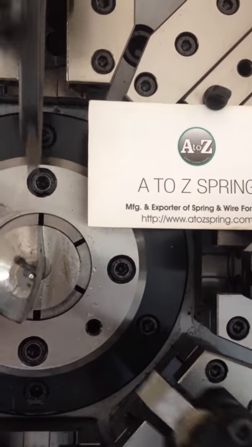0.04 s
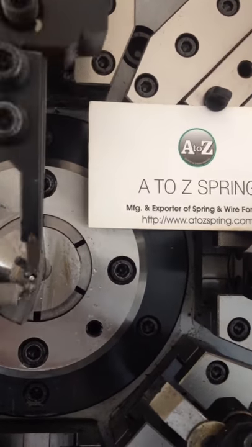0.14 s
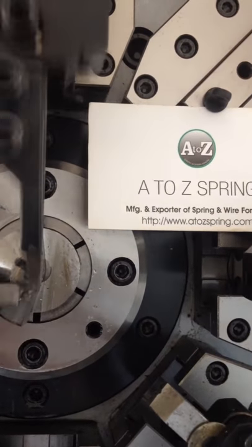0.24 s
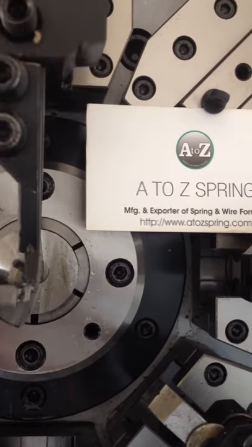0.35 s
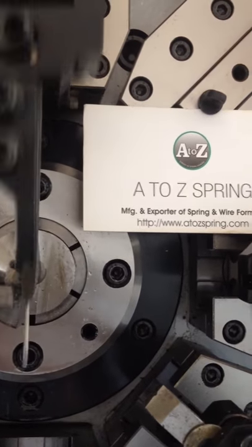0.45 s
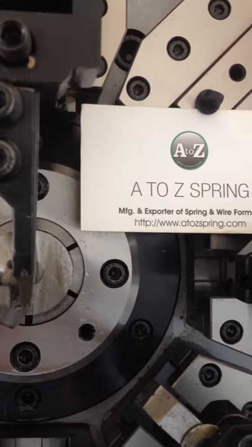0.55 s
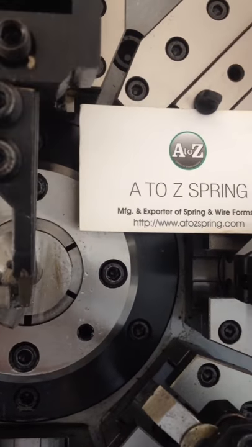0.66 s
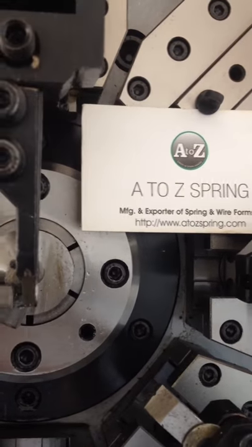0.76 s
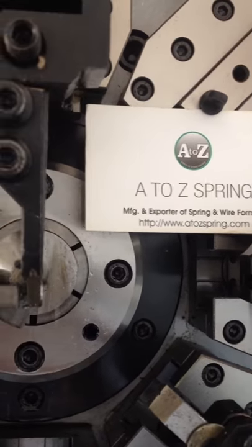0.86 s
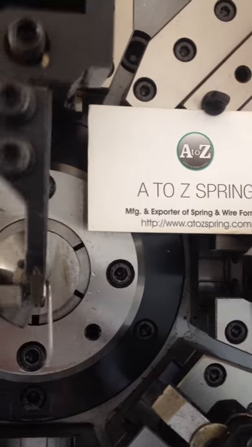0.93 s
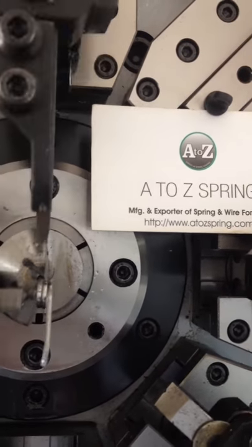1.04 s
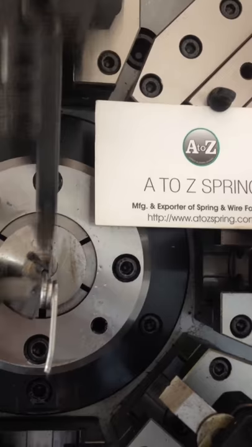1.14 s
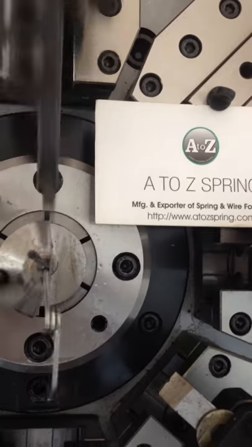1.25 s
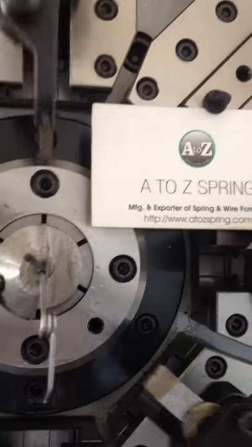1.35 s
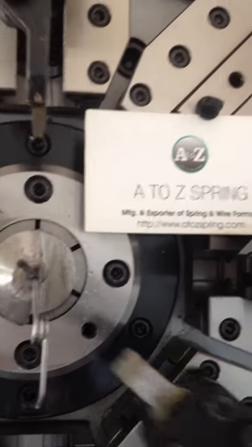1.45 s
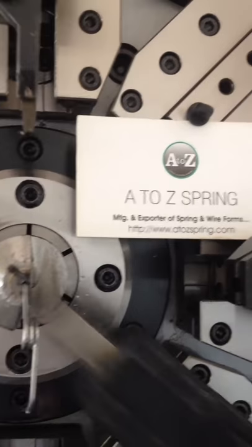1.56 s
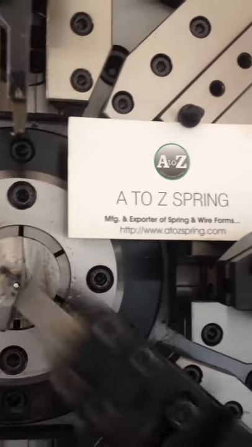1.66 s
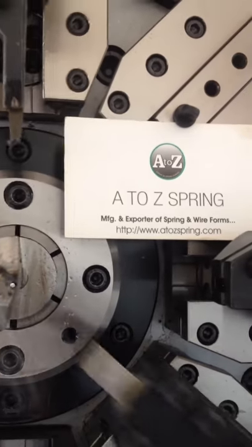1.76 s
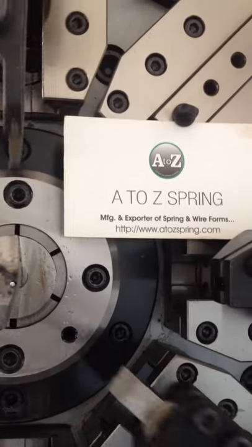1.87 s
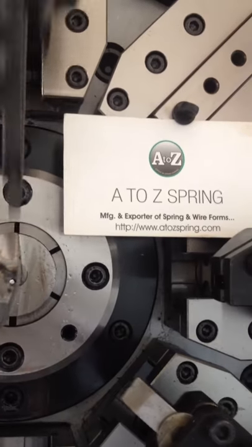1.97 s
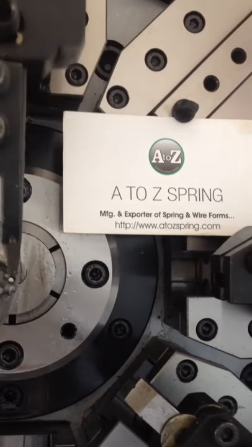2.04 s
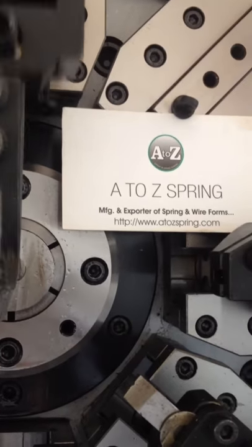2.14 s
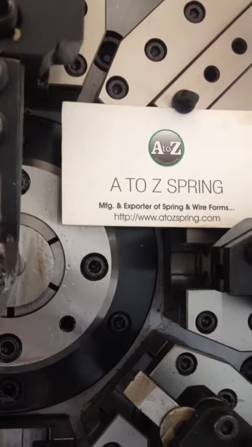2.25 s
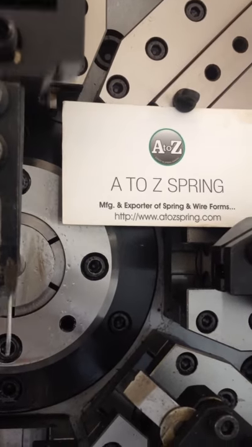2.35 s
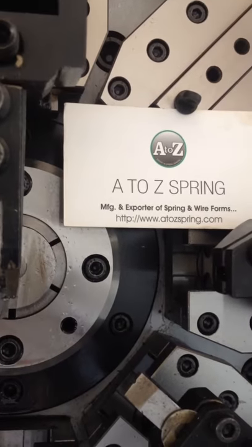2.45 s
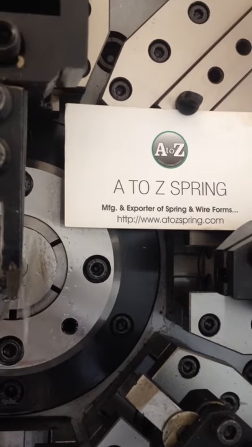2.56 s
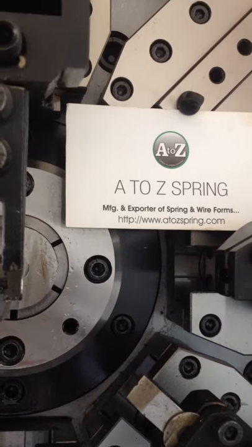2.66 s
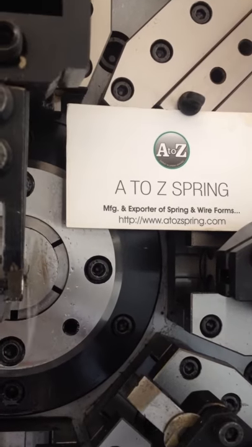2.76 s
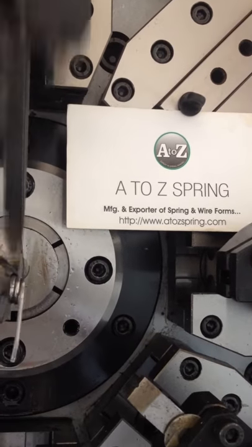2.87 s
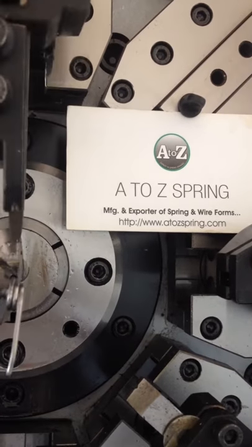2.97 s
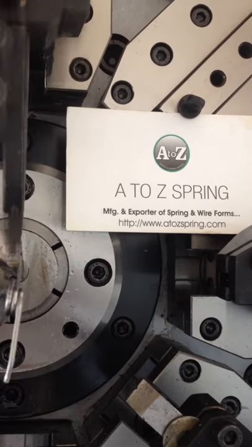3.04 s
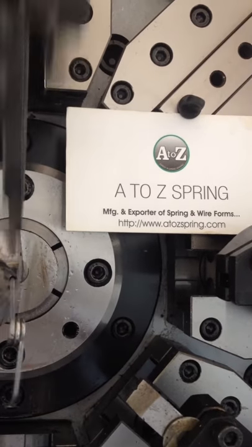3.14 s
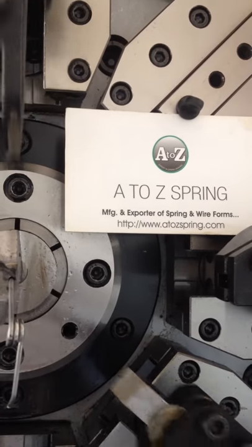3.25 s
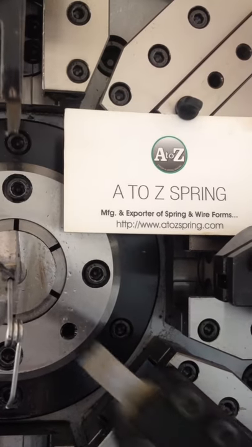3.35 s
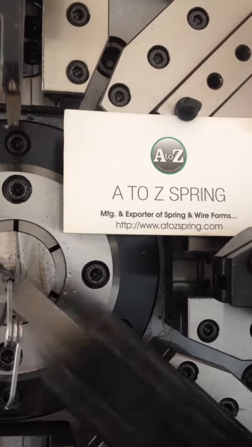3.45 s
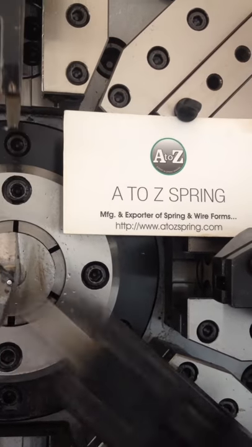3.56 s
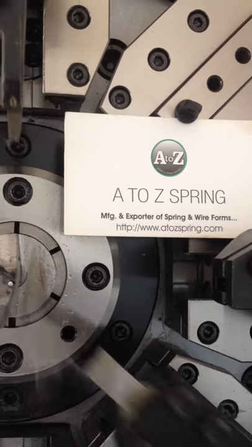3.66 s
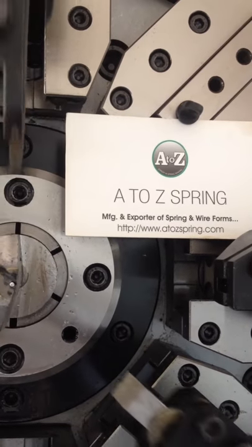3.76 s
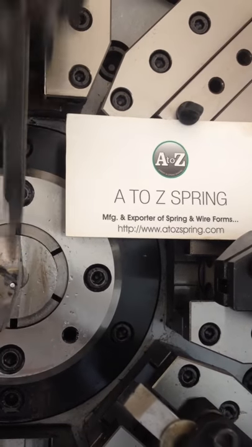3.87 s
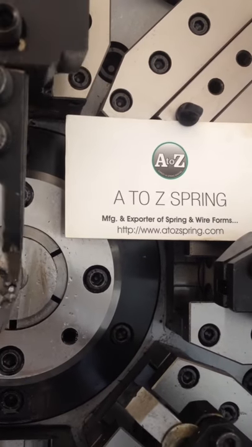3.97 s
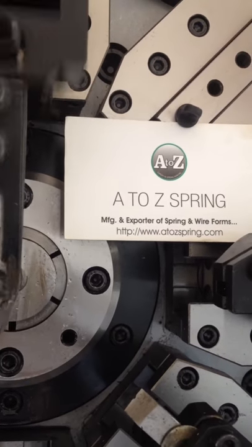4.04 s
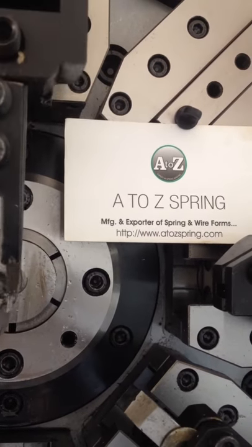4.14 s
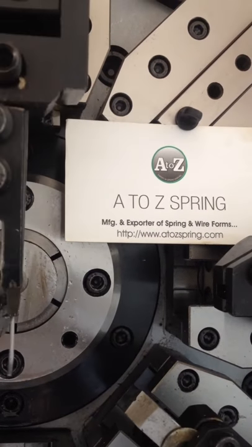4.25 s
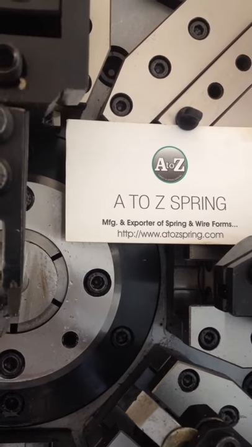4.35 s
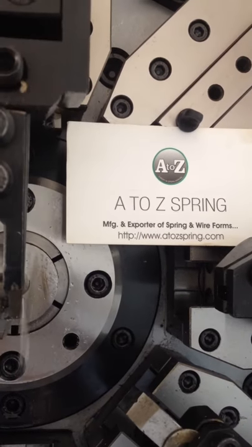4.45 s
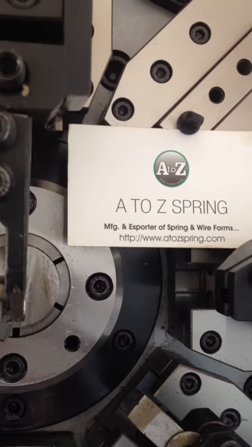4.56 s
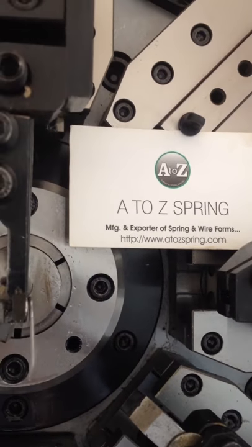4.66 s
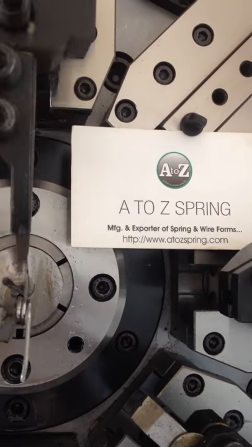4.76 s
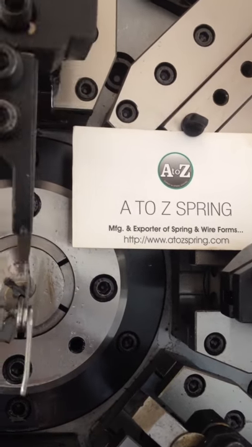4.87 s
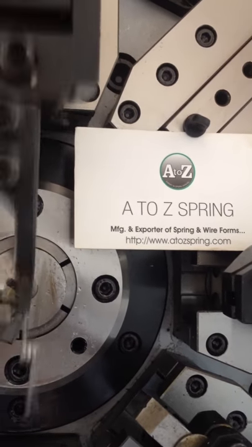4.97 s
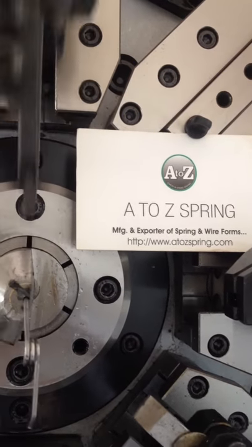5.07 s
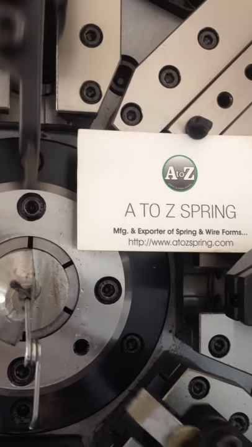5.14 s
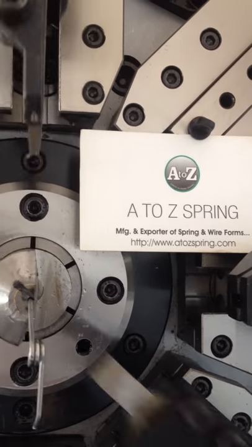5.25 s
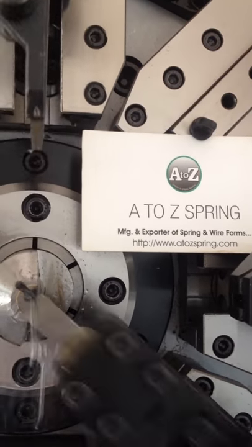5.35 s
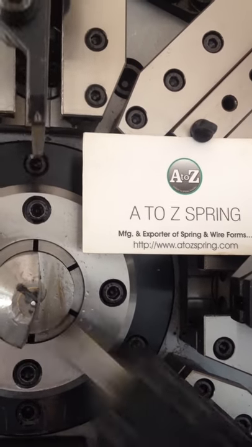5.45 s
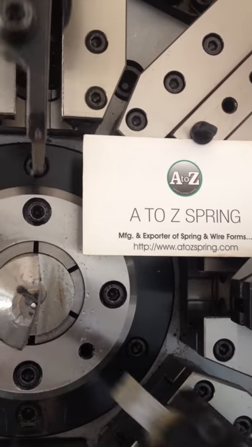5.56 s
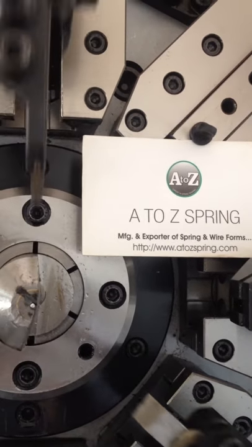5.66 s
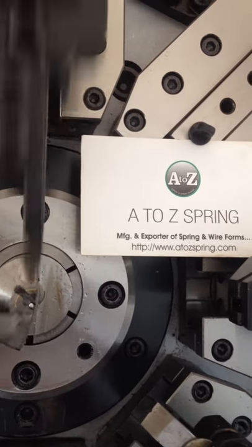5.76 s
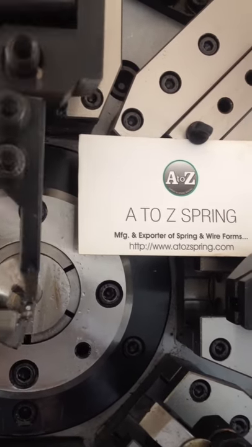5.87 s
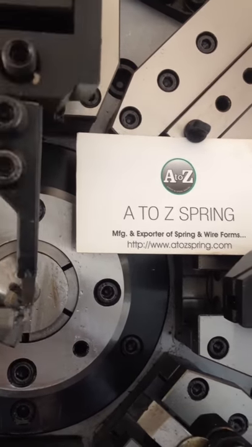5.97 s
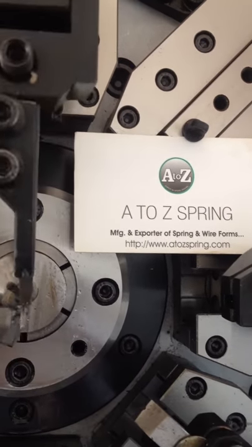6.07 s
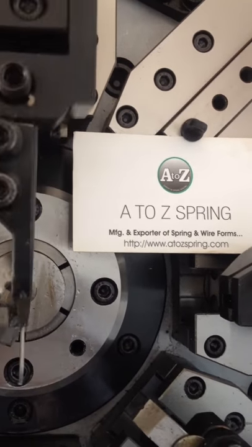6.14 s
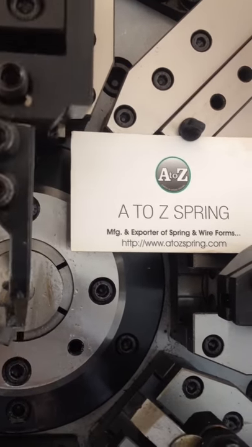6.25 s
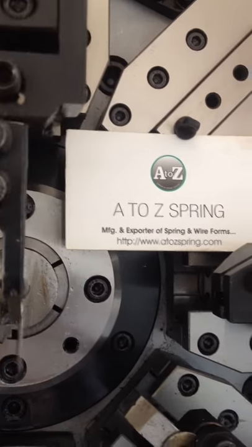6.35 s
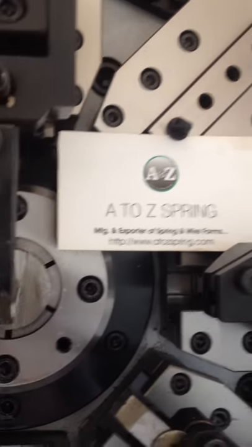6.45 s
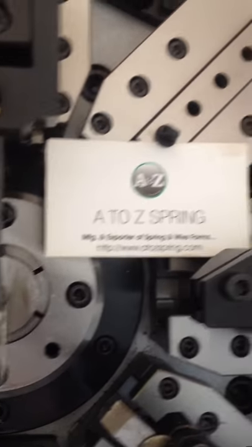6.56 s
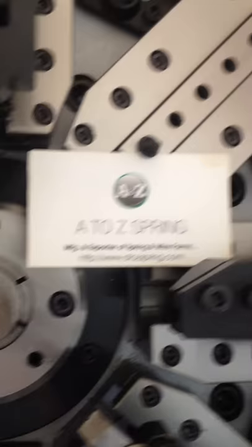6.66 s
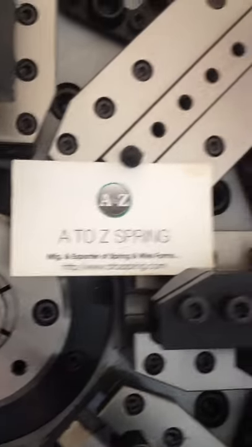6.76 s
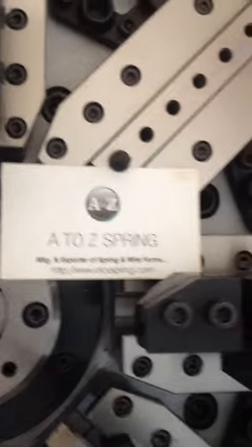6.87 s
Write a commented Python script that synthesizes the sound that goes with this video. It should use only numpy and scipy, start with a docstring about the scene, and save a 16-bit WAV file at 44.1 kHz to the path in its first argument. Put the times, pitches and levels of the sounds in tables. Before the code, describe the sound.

Over the wavering low hum of a factory, a nearby wire-forming machine works in a steady cycle. Soft whirs and a faint tick lead up to each sharp cutting knock, which leaves a short, low metallic ring. The knock comes three times, evenly spaced. Small metal parts tap with a slight echo in the second half, while distant machines and a light hiss fill the background.

```python
"""In a factory hall, a machine bends wire into springs. Once a cycle its cutter knocks and the
steel frame rings. Tool slides whir at fixed points of the cycle over the noise of the motor.
Metal parts tap nearby. Behind it all lie the hall's hum, distant machines and microphone hiss."""
import sys
import numpy as np
from scipy import signal
from scipy.io import wavfile
from scipy.ndimage import uniform_filter1d

SR = 44100
rng = np.random.default_rng(int(sys.argv[2]) if len(sys.argv) > 2 else 0)


def store_pcm(level_fs):
    """Save levels as 16-bit WAV."""
    pcm = np.round(np.clip(level_fs, -1, 1) * 32767).astype(np.int16)
    wavfile.write(sys.argv[1], SR, np.atleast_2d(pcm).T)


N = 304731

# Levels in the tables are relative. A "fade" is the time a sound takes to drop by 60 dB.
# Ringing tones of the frame and tool plate: f/Hz, level/dB, fade/s
FRAME_TONES = [(159.6, -32, 0.85), (184.2, -23.5, 0.24), (191, -34, .5), (202.4, -15, .65),
               (208.6, -38, 0.87), (228.3, -22.5, 0.29), (249.4, -29.5, 0.23), (293.5, -25, 0.46),
               (318.6, -25.5, 0.48), (355.3, -26.5, 0.49), (376, -29, 0.19), (430.5, -26.5, 0.28),
               (448, -44, 0.52), (482, -28, .2), (513.7, -30, 0.26), (640, -36, 0.11), (752.4, -26.5, .22),
               (803, -33, 0.15), (810, -29, 0.28), (817, -33, 0.12), (1440, -37, 0.11), (1626, -48, .3),
               (2450, -52, .2), (2523, -50, 0.2), (2640, -52.5, .22), (4630, -52.5, 0.022),
               (5900, -67.5, .1), (6480, -57, 0.082), (7880, -58.5, 0.02), (11500, -69, .02)]
# Tones of the snapping blade: f/Hz, level/dB, fade/s
BLADE_TONES = [(436, -11, 0.016), (865, -15, 0.024), (1176, -17, 0.02), (1966, -35, 0.031),
               (4110, -52.5, 0.015)]
# Clatter of many small vibrations: f/Hz, level/dB
CLATTER_SPECTRUM = [(300, -49), (600, -37), (1200, -47), (2400, -56.5), (4000, -65), (7000, -75),
                    (14000, -81.5)]
# How long the clatter lasts: f/Hz, fade/s
CLATTER_FADES = [(300, 1), (1000, 0.51), (2500, .2), (5000, 0.055), (12000, 0.023)]
# Moves of the tool slides: t/s after the cut, length/s, level/dB
SLIDE_MOVES = [(.42, .04, -61), (.55, .06, -55), (.80, .12, -62), (1.245, .045, -55.5), (1.49, .08, -53.5),
               (1.76, .1, -60)]
# Noise bands of a moving slide: f/Hz, width/Hz, level/dB
SLIDE_BANDS = [(350, 60, -3), (700, 150, -4), (890, 130, 0), (1300, 400, -14)]
# Noise bands of the motor in its housing: f/Hz, width/Hz, level/dB
MOTOR_BANDS = [(345.2, 36.3, -53.5), (848, 160, -68)]
# The motor gets louder: t/s after the cut, length/s, boost/dB
MOTOR_SURGES = [(.55, .06, 2), (.86, .12, 1.5), (1.09, .05, 4), (1.49, .08, 3)]
# Metal taps: t/s, level/dB, f/Hz, fade/s, thud boost/dB, echo boost/dB
METAL_TAPS = [(2.410, -57, 1600, .03, -10, -6), (2.526, -56.5, 1414, 0.11, -10, 3),
              (4.098, -44, 1360, 0.023, 15.5, 8), (4.3685, -38, 1730, 0.016, 1, 0),
              (4.544, -51.5, 1500, 0.023, -12, -8), (6.1435, -36.5, 1445, 0.032, -16, -2),
              (6.162, -38, 1610, 0.029, -4, 3), (6.244, -42, 790, 0.028, 0, -10),
              (6.267, -38.5, 1140, 0.015, 10.5, 9), (6.280, -40, 1550, 0.017, -2, 3),
              (6.283, -27, 692, 0.047, -4, 3)]
# Tones of a tapped part: multiple of its pitch, level/dB
PART_TONES = [(1, 2.5), (1.3, -6), (1.75, -24.5), (2.4, -31)]
# Low hum of the hall: f/Hz, level/dB
HUM_SPECTRUM = [(100, -39.5), (118, -41.5), (130, -8), (145, 7), (199, 4), (250, -4.5), (300, -11.5),
                (400, -59.5)]
# The hum dips while the drives rest: t/s after the cut, length/s, change/dB
HUM_DIPS = [(1.38, .05, -4), (1.72, .05, -2)]
# Wash of distant machines and hiss: f/Hz, level/dB
WASH_SPECTRUM = [(20, -49), (50, -21), (100, -11.5), (200, -1), (300, 2), (430, -4), (913, -13),
                 (1100, -19.5), (1940, -32), (3500, -38.5), (6000, -42), (9690, -58), (12000, -46.5),
                 (14000, -38.5), (15300, -42)]

CYCLE_S, FIRST_CUT_S, CUT_GAIN_DB = 1.8822, -.1952, -.5
# A tick once a cycle: t/s after the cut, then the other columns of a metal tap
TICK_S, TICK = 1.4365, (-52, 1500, .018, 2, 2)
WHINE_HZ, WHINE_DB = 2815, -89.5
HUM_DB, WORK_BOOST_DB, WAVER_DB, WASH_DB = -38.6, 3, .5, -49
TREBLE_LIMIT_HZ = 15380


def cutter():
    """The blade shears the wire at the same spot, so the frame rings the same way each time."""
    t = np.arange(SR * 3 // 4) / SR
    ring = ringing(FRAME_TONES, t, rise_cycles=3.1) + ringing(BLADE_TONES, t, rise_cycles=1.0)
    clatter = 10 * noise_burst(CLATTER_SPECTRUM, CLATTER_FADES, rise_s=0.00097)
    out = np.zeros(N)
    for start in cut_times():
        add(out, start, ring)
        add(out, start, clatter)
    return amp(CUT_GAIN_DB) * out


def slides():
    """Each tool slide whirs as it moves at its own point in the cycle."""
    return cycle_swells(SLIDE_MOVES, amp) * band_noise(SLIDE_BANDS)


def motor():
    """The motor drones and surges in its housing; its electronics add a thin whine."""
    t = np.arange(N) / SR
    drone = amp(cycle_swells(MOTOR_SURGES, float)) * band_noise(MOTOR_BANDS)
    whine = amp(WHINE_DB) * np.sqrt(2) * np.sin(2 * np.pi * WHINE_HZ * t)
    return drone + whine


def taps():
    """A tapped metal part gives a short ring and a thud, then the hall echoes."""
    out, t = np.zeros(N), np.arange(SR // 10) / SR
    onset = 1 - np.exp(-(t / 0.00063) ** 2)  # distance softens the start
    thud_tones = np.sin(2 * np.pi * 260 * t) + 0.49 * np.sin(2 * np.pi * 450 * t)
    ticks = [(cut + TICK_S, *TICK) for cut in cut_times()]
    for start, db, hz, fade, thud_db, echo_db in METAL_TAPS + ticks:
        tones = sum(amp(level) * np.sin(2 * np.pi * ratio * hz * t) for ratio, level in PART_TONES)
        ring = amp(-60 * t / fade) * tones
        thud = amp(thud_db - 60 * t / 0.063) * thud_tones
        echo_spectrum = [(0.088 * hz, -6), (0.18 * hz, 0), (0.74 * hz, 0),
                         (1.02 * hz, -8), (1.91 * hz, -24), (5 * hz, -60)]
        echo = 2 * noise_burst(echo_spectrum, fades=[(500, 0.31), (3000, 0.1)], rise_s=0.0047)
        add(out, start, amp(db) * onset * (ring + thud))
        add(out, start, amp(db + echo_db) * echo)
    return out


def hall():
    """The hum wavers, swells as the slides work and dips as they rest, beside a steady wash."""
    t = np.arange(N) / SR
    work = cycle_swells(SLIDE_MOVES, amp)
    rates_hz = np.geomspace(.3, 4, num=16)
    waver = sum(np.sin(2 * np.pi * (hz * t + rng.random())) / np.sqrt(hz) for hz in rates_hz)
    hum_db = HUM_DB + WORK_BOOST_DB * work / work.max() + cycle_swells(HUM_DIPS, float)
    hum_db += WAVER_DB * unit_level(waver)
    hum = amp(hum_db) * drifting_noise(HUM_SPECTRUM, drift_db=2.0)
    wash = amp(WASH_DB) * drifting_noise(WASH_SPECTRUM, drift_db=-0.4)
    return hum + wash


def cut_times():
    """One cut every cycle, in seconds."""
    return np.arange(FIRST_CUT_S, N / SR, CYCLE_S)


def cycle_swells(rows, convert):
    """Smooth swells that return every cycle; convert turns a row's dB into a height."""
    since_cut = (np.arange(N) / SR - FIRST_CUT_S) % CYCLE_S
    return sum(convert(db) * np.exp(-2 * ((since_cut - at) / length) ** 2) for at, length, db in rows)


def ringing(tones, t, rise_cycles):
    """Tones of struck metal build up, then fade; neighbours start in opposite directions."""
    out = np.zeros(len(t))
    for k, (hz, db, fade) in enumerate(tones):
        rise = 1 - np.exp(-t * hz / rise_cycles)
        out += (-1) ** k * rise * amp(db - 60 * t / fade) * np.sin(2 * np.pi * hz * t)
    return out


def noise_burst(spectrum, fades, rise_s, count=SR // 2):
    """Noise that builds up quickly, then each band fades at its own speed."""
    hz, t, bands = signal.stft(rng.standard_normal(count), SR, nperseg=256, noverlap=192)
    bands *= amp(value_at(spectrum, hz)[:, None] - 60 * t / value_at(fades, hz)[:, None])
    burst = signal.istft(bands, SR, nperseg=256, noverlap=192)[1][:count]
    return burst * np.minimum(np.arange(count) / SR / rise_s, 1)


def band_noise(bands):
    """Noise heard through a housing that rings in a few broad bands."""
    noise, out = rng.standard_normal(N), np.zeros(N)
    for hz, width, db in bands:
        peak = signal.iirpeak(hz, hz / width, SR)
        band = signal.lfilter(*peak, signal.lfilter(*peak, noise))
        out += amp(db) * unit_level(band)
    return out


def drifting_noise(spectrum, drift_db, size=4096):
    """Noise whose bands grow louder and softer at random."""
    frames, hz = N // (size // 4) + 5, np.fft.rfftfreq(size, 1 / SR)
    real, imag, drift = rng.standard_normal((frames, len(hz), 3)).T
    drift = uniform_filter1d(drift, size=16, axis=0)  # smooth across pitch
    drift = unit_level(uniform_filter1d(drift, size=8, axis=1))  # and over time
    bands = (real + 1j * imag) * amp(value_at(spectrum, hz)[:, None] + drift_db * drift)
    return unit_level(signal.istft(bands, nperseg=size, noverlap=size * 3 // 4)[1][:N])


def amp(db):
    """Turn decibels into a gain."""
    return 10 ** (np.asarray(db) / 20)


def unit_level(x):
    """Scale to an average power of 1."""
    return x / np.sqrt(np.mean(x ** 2) + 1e-20)


def value_at(points, hz):
    """Read a table between its listed frequencies."""
    listed_hz, values = np.transpose(points)
    return np.interp(np.log(hz + 1), np.log(listed_hz + 1), values)


def add(mix, start_s, sound):
    """Mix a sound in, dropping what falls outside the scene."""
    at = round(start_s * SR)
    sound = sound[max(-at, 0):]
    part = mix[max(at, 0):][:len(sound)]
    part += sound[:len(part)]


def scene():
    """All the sounds together in one channel."""
    # the deep bass of the knocks and taps is turned down
    bass_cut = signal.butter(N=4, Wn=130, btype="high", fs=SR, output="sos")
    knocks = signal.sosfilt(bass_cut, cutter() + taps())
    return (knocks + motor() + slides() + hall())[None]


def record(dry):
    """Cut off the highest treble."""
    treble_cut = signal.firwin(1023, TREBLE_LIMIT_HZ, window=("kaiser", 9), fs=SR)
    return signal.oaconvolve(dry, treble_cut[None], "same")


dry = scene()
out = record(dry)
store_pcm(out)
```